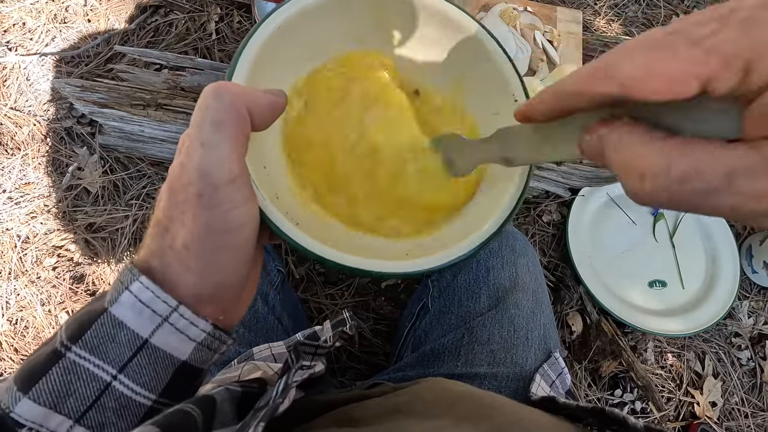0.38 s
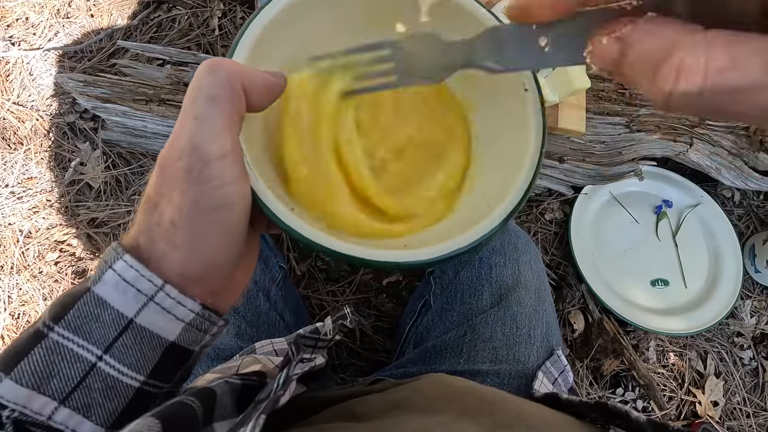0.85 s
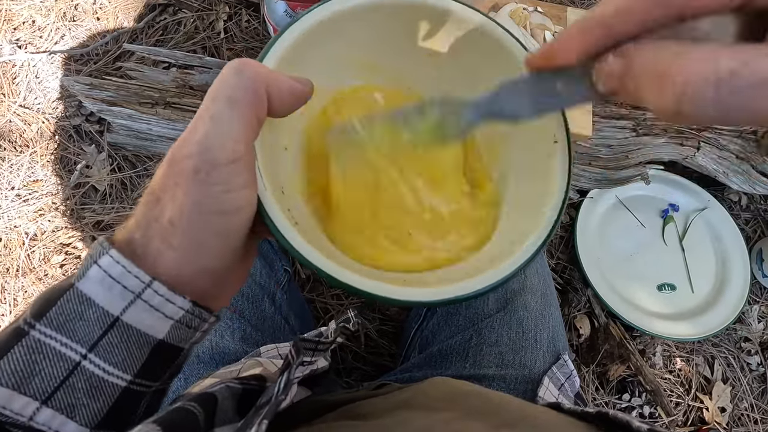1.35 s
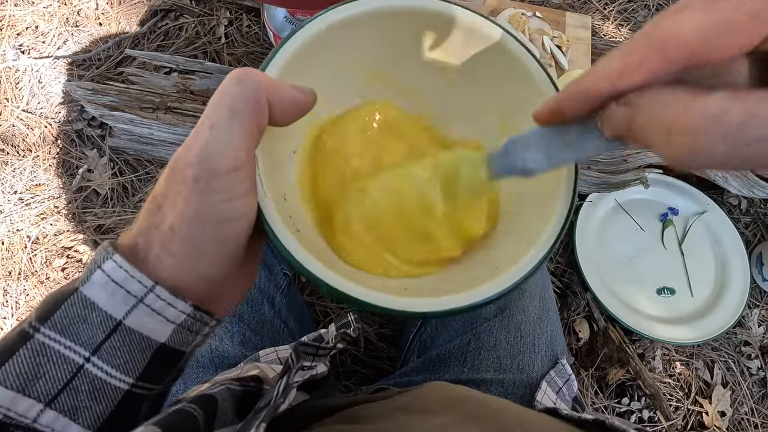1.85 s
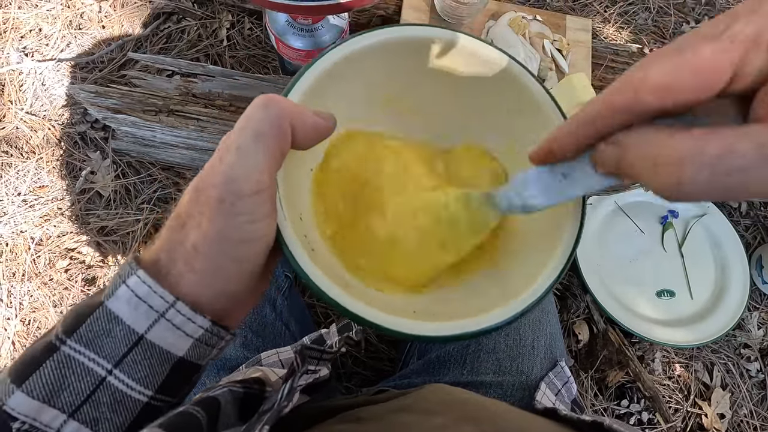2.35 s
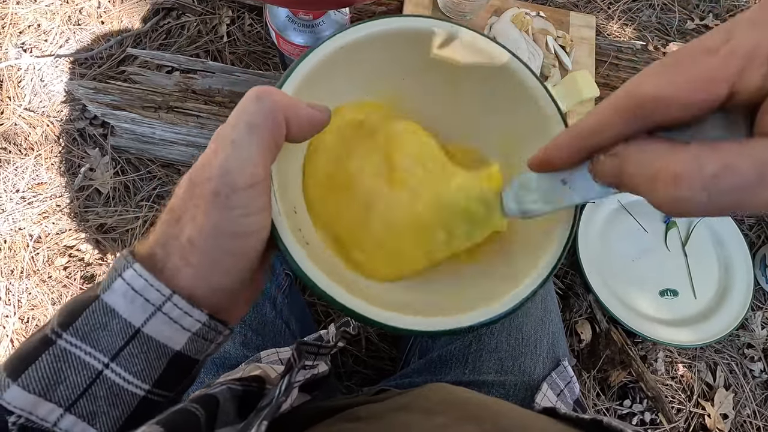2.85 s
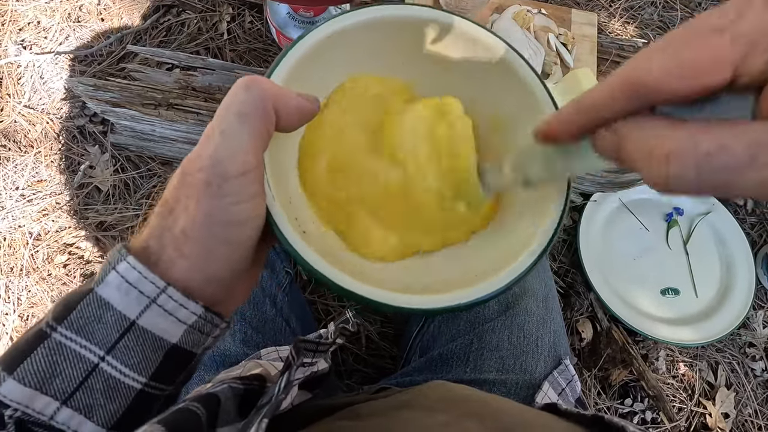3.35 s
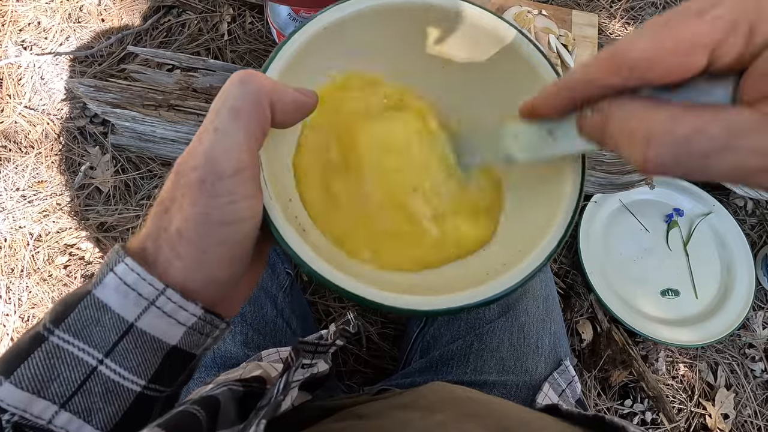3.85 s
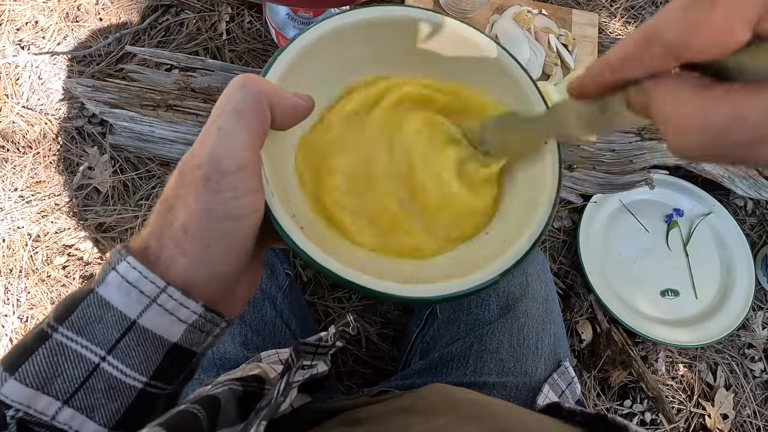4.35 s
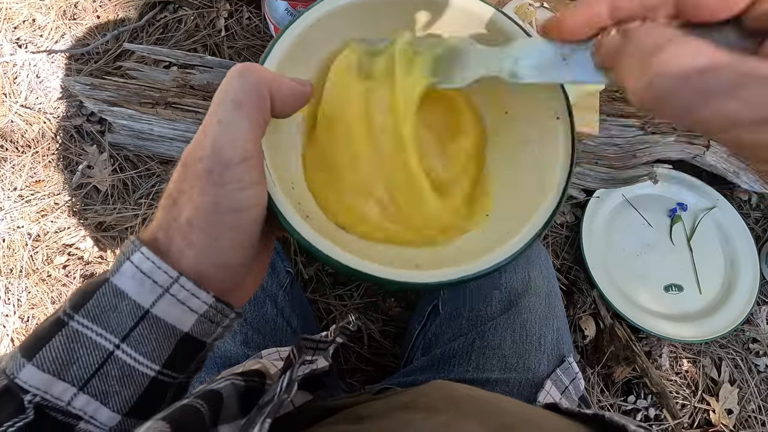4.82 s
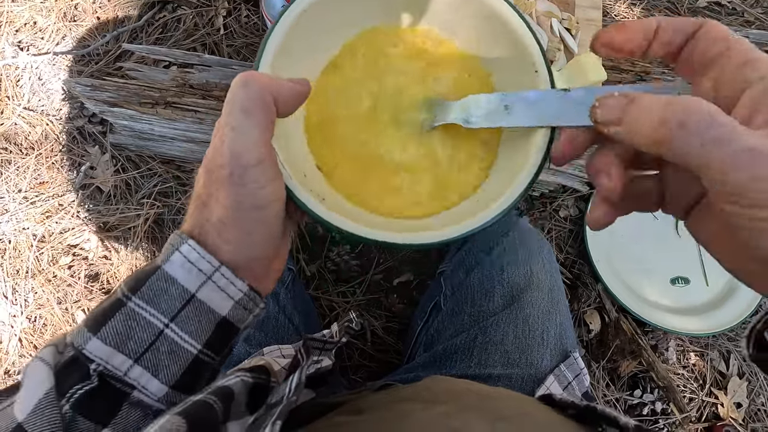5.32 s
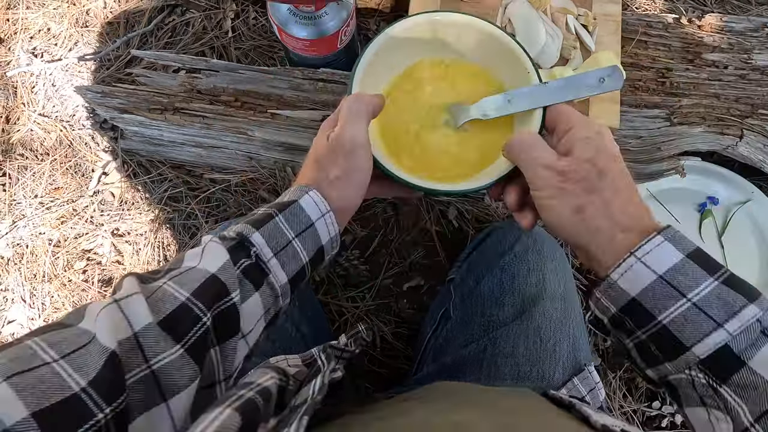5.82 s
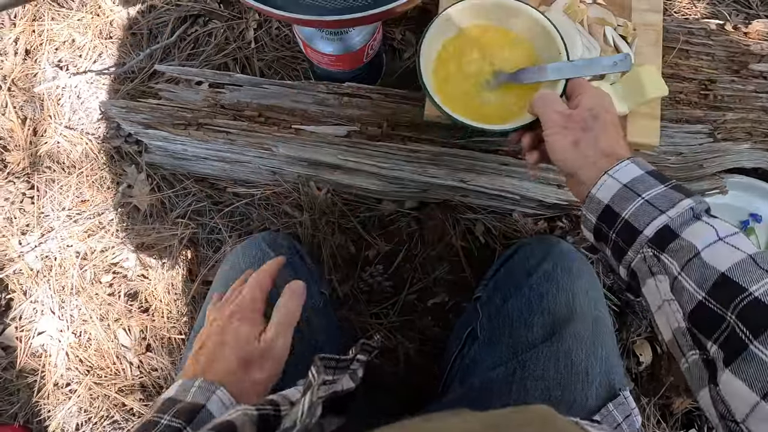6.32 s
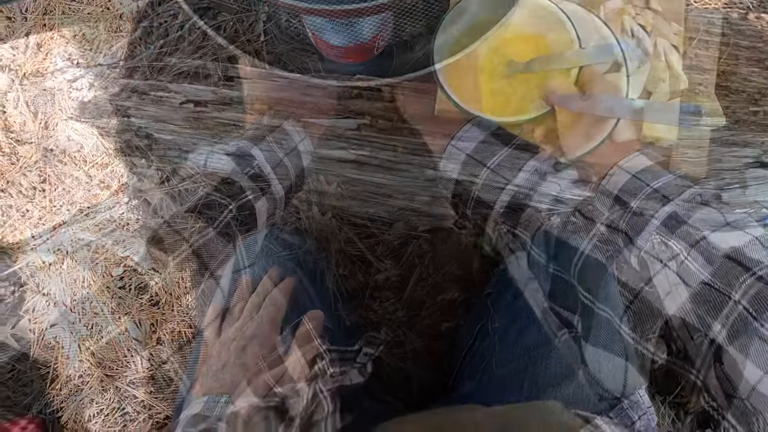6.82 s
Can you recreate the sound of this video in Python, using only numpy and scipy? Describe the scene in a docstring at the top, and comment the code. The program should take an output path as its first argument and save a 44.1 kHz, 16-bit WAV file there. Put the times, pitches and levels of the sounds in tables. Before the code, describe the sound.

A table knife beats thick egg in a hand-held enamel bowl, quick metallic ticks and wet slaps, then rests and the bowl is set down outdoors.

```python
"""Quick ticks and wet scrapes: a table knife beats eggs in a hand-held enamel bowl, six strokes a second.
Ticks ring the metal, the dragging blade sticks and slips, and air pockets in the egg gulp and pop as sines.
Then the knife is laid down, slides and settles on the rim, and the bowl is set on a board with a knock and a crunch.
Outdoors behind it, shaped noise makes wind in far trees and a low rumble; a faint sine is a bird's peep.
"""
import sys
import numpy as np
from scipy import signal
from scipy.fft import rfft, irfft, next_fast_len
from scipy.io import wavfile

SR = 44100
rng = np.random.default_rng(int(sys.argv[2]) if len(sys.argv) > 2 else 0)


def invert_db(x):
    """Field ratio 10**(x/20) for x, a level in decibels (scalar or array-like)."""
    u = np.asarray(x, float) / 20
    return 10 ** u


def generate_wav(signal):
    """Clip the signal to [-1, 1] and save it as 16-bit WAV at the path in sys.argv[1]."""
    frames = np.transpose(np.atleast_2d(signal))
    scaled = np.clip(frames, -1, 1) * 32767
    pcm = np.round(scaled).astype(np.int16)
    wavfile.write(sys.argv[1], SR, pcm)


N = 317079   # length of the scene in samples


def rms_one(x):
    """Scale to unit rms (average strength)."""
    return x / np.sqrt(np.mean(x ** 2) + 1e-20)


def curve_db(rows):
    """Turn rows of (time [s], level [dB]) into a gain per sample, silent outside them."""
    s, db = np.transpose(rows)
    return invert_db(np.interp(np.arange(N) / SR, s, db, left=-200, right=-200))


def ring(clicks, hz, t60):
    """Each unit click starts a sine near height 1 that falls by 60 dB in t60 seconds."""
    r = invert_db(-60 / (t60 * SR))
    w = 2 * np.pi * hz / SR
    return signal.lfilter([0, np.sin(w)], [1, -2 * r * np.cos(w), r * r], clicks + 1e-18)


def dying_clicks(clicks, t60):
    """Each click becomes a sudden start that falls by 60 dB in t60 seconds."""
    return signal.lfilter([1], [1, -invert_db(-60 / (t60 * SR))], clicks)


def colour(x, spectrum):
    """Shape noise to rows of (frequency [Hz], level [dB per Hz]), then scale to unit rms."""
    size = next_fast_len(N)
    hz, db = np.transpose(spectrum)
    axis = np.log(np.fft.rfftfreq(size, 1 / SR) + 1)
    gain = invert_db(np.interp(axis, np.log(hz), db))
    return rms_one(irfft(rfft(x, size) * gain, size)[:N])


def grains(per_s, spread_db):
    """Random clicks of uneven size and sign."""
    sizes = invert_db(spread_db * np.minimum(rng.exponential(1, N), 5)) * rng.choice([-1, 1], N)
    return sizes * (rng.random(N) < per_s / SR)


def passed(x, hz, kind, order=2):
    """Butterworth filter: keep only low, high or middle frequencies."""
    return signal.sosfilt(signal.butter(order, hz, kind, fs=SR, output="sos"), x)


# blade touching the bowl; the faintest rows are small pops in the egg:
# (time [s], level [dB], treble [dB])
TICKS = [(0.0027, -17, -9), (0.1455, -28, 0), (0.1572, -15, -1.5), (0.3501, -15, 2), (0.548, -10, -3),
         (0.7134, -29.5, -21), (0.7501, -22.5, -7), (0.7562, -5, -3), (0.9322, -19, -3.5),
         (0.941, -11.5, -0.5), (0.9498, -18, -4.5), (0.9631, -15, -11), (1.1192, -13.5, -3.5),
         (1.24, -34, -11), (1.2876, -9, -2.5), (1.2967, -6.5, -23), (1.411, -25, -35), (1.4511, -8, -4),
         (1.4664, -30.5, -7), (1.5568, -32.5, -12), (1.6295, -12, -4.5), (1.6389, -18, -11),
         (1.7918, -27, -16.5), (1.8003, -25.5, -8), (1.809, -11, -2.5), (1.9267, -32, -4),
         (1.9827, -9.5, -6), (2.1346, -22.5, -14.5), (2.1525, -11.5, -11), (2.2649, -30.5, -11),
         (2.305, -20, 4.5), (2.3282, -8, -6.5), (2.4053, -18.5, -5), (2.446, -30, -17),
         (2.5078, -12.5, -5.5), (2.5488, -21, 2), (2.6755, -11, -12.5), (2.8472, -11.5, -2),
         (2.9766, -32, -11), (3.0166, -15.5, -17), (3.024, -10.5, -5), (3.1951, -10.5, -5),
         (3.3533, -23, -38.5), (3.3705, -10.5, -5), (3.4555, -25, -30), (3.5305, -11, -8),
         (3.5372, -13, -6.5), (3.5482, -12, -5), (3.5661, -15.5, -9), (3.655, -25, -18.5),
         (3.7164, -10, -17), (3.7267, -14.5, -5), (3.877, -30, -28.5), (3.8846, -17.5, -12),
         (3.8927, -9, -7), (3.909, -26.5, -8.5), (4.0617, -13, -3.5), (4.0732, -24, -26.5),
         (4.1407, -33.5, -5), (4.1703, -30, -32), (4.213, -28, -27), (4.2237, -14, -5.5),
         (4.3955, -13.5, -1.5), (4.534, -25, -36), (4.564, -12, -23), (4.5717, -14.5, -0.5),
         (4.6282, -15, -5), (4.7276, -8.5, -11.5), (4.7418, -11.5, -2.5), (4.7813, -15, -32.5),
         (4.876, -26.5, -19.5), (4.893, -11, -11.5), (4.8985, -7.5, -20.5), (4.9657, -33.5, -25.5),
         (5.106, -12, -7.5), (5.1137, -12.5, -8)]
# ringing modes of the bowl and blade, damped by egg: (frequency [Hz], level [dB], ring time t60 [s])
BOWL = [(244, -24, 0.031), (846, -12, 0.02524), (1100, -1.5, 0.025), (1500, -4, 0.012), (1899, -7, .04),
        (2189, -6, 0.026), (2710, -5, 0.022), (3053, -6, 0.021), (3514, -8, 0.036), (3988, -7, 0.019),
        (4634, -12, 0.024), (5050, -27, 0.13), (5564, -14, 0.025), (6536, -12.5, 0.019), (7246, -16, .02),
        (8090, -28.5, .02), (11280, -10, 0.0055)]
SKID_MS, SKID_DB = 3.0, -4.0   # time range and relative level of a second, weaker click after each tick
SNAP_DB = 3.0   # bare click, before filtering


def ticks():
    """Blade touches, and faint egg pops made alike: each rings every mode with its own luck, a snap and a crack."""
    s, peak_db, treble_db = np.transpose(TICKS)
    at = np.round(s * SR).astype(int)
    luck = rng.normal(0, 1, (len(s), len(BOWL)))
    skid = at + 8 + (SKID_MS / 1000 * SR * rng.random(len(s))).astype(int)   # a touching blade skids
    ringing = np.zeros(N)
    for k, (hz, level_db, t60) in enumerate(BOWL):
        clicks = np.zeros(N)
        firm_db = 12.0 * t60 * (peak_db + 9)      # firm blows favour the long-ringing modes
        blow_db = peak_db + level_db - 7.0 + firm_db + (treble_db + 9.0) * (hz > 5300)
        clicks[at] = invert_db(blow_db + 5.56 * luck[:, k]) * (-1) ** k
        # another mode's luck makes the second click differ from the first
        clicks[skid] += invert_db(blow_db + SKID_DB + 6.4 * luck[:, k - 5]) * (-1) ** (k // 2)
        ringing += ring(clicks, hz, t60)
    knocks = np.zeros(N)
    knocks[at] = invert_db(peak_db + .5 * treble_db)
    crack = passed(dying_clicks(knocks, 0.015) * rng.standard_normal(N), [900, 9000], "band")
    snap = passed(passed(knocks, 2500, "high"), 7500, "low")
    return ringing + invert_db(SNAP_DB) * snap + invert_db(1.35) * crack


# strokes across the bowl:
# (start [s], firmest moment [s], level at that moment [dB], lift-off [s], lower furrow resonance [Hz])
STROKES = [(0.0, 0.025, -23.5, 0.049, 1010), (0.149, 0.196, -43, 0.26, 1310),
           (0.345, 0.4, -31.5, 0.431, 1200), (0.546, 0.601, -24, 0.6316, 1200),
           (0.747, 0.794, -33, 0.838, 1280), (0.93, 0.998, -25, 1.0115, 740),
           (1.115, 1.165, -21.5, 1.1835, 1590), (1.284, 1.325, -26, 1.362, 1160),
           (1.45, 1.5, -22.5, 1.525, 1390), (1.625, 1.663, -20, 1.685, 1040),
           (1.799, 1.85, -19.5, 1.864, 1260), (1.98, 2.02, -25, 2.053, 910),
           (2.137, 2.188, -22, 2.218, 1100), (2.306, 2.366, -21.5, 2.39, 1730),
           (2.499, 2.552, -25, 2.58, 1020), (2.671, 2.726, -27, 2.752, 1060),
           (2.842, 2.891, -23.5, 2.929, 1155), (3.014, 3.069, -24, 3.095, 810),
           (3.191, 3.228, -20.5, 3.27, 1060), (3.361, 3.427, -25.5, 3.449, 920),
           (3.528, 3.589, -25, 3.618, 1060), (3.713, 3.765, -19, 3.797, 1460),
           (3.889, 3.931, -24.5, 3.963, 1510), (4.056, 4.104, -19.5, 4.125, 1500),
           (4.22, 4.25, -23, 4.31, 940), (4.391, 4.484, -26.5, 4.498, 710),
           (4.559, 4.632, -25, 4.659, 1740), (4.723, 4.782, -20.5, 4.801, 1040),
           (4.887, 4.929, -29.5, 4.96, 1270), (5.103, 5.138, -31, 5.161, 755)]
USUAL_FIRM_DB = -24   # firmest pressure of a usual stroke
DRAG_DB, DRAG_FOLLOWS = -33, 0.59   # usual pressure before bearing down; share of a stroke's extra force
EASE_DB_PER_S, EASE_START_DB = 150.5, -5.5   # pressure falls after the firmest moment
LAND_S, BEAR_S, LEAVE_S = .006, .016, .025   # landing, bearing down, leaving the egg


def pressure():
    """Blade pressure: lands, eases, bears down mid-bowl, lifts off."""
    rows = []
    for start, firm, firm_db, lift, hz in STROKES:
        drag_db = DRAG_DB + DRAG_FOLLOWS * (firm_db - USUAL_FIRM_DB)
        last_db = firm_db + EASE_START_DB - EASE_DB_PER_S * (lift - firm)
        rows += [(start - LAND_S, -85), (start + .002, drag_db + 4.5)]
        rows += [(firm - BEAR_S, drag_db), (firm, firm_db)]
        rows += [(max(lift - .012, firm + .002), last_db)]
        rows += [(lift + 0.0073, last_db - 16), (lift + LEAVE_S, -85)]
    return curve_db(sorted(rows))


def stick_slip(press, slide):
    """A rubbing blade sticks and slips in many tiny jerks, which ring the bowl's modes."""
    slips = rms_one(grains(3000, spread_db=4.0)) * (invert_db(-5.5) * press + invert_db(9.5) * slide)
    rubbed = np.zeros(N)
    for hz, level_db, t60 in BOWL:
        rubbed += invert_db(level_db) * ring(slips, hz, t60) * np.sqrt(1 / t60 / SR)
    return rubbed


# colour of the drag: (frequency [Hz], level [dB per Hz])
DRAG = [(300, -36), (900, -11), (2400, -8), (4000, -14.5), (7200, -22), (11500, -35.5), (16000, -69)]


def drag_hiss(press, slide):
    """Grainy noise of scraping; it grows slower than the pressure."""
    hiss = press ** 0.55 * colour(grains(4000, spread_db=4.0), DRAG)
    rim_grit = rms_one(passed(grains(1500, spread_db=5.0), [1200, 6500], "band"))
    return hiss + invert_db(14.5) * slide * rim_grit


def splats(press):
    """Wet crackle under the blade: tiny pockets of every size burst and ring a few dozen cycles."""
    bursts = grains(1000, spread_db=5.0)
    dealt = rng.integers(0, 28, N)   # deals each burst to one of 28 pitches
    out = np.zeros(N)
    drag_hz, drag_db = np.transpose(DRAG)
    for k, hz in enumerate(np.geomspace(600, 8200, 28)):
        level_db = np.interp(np.log(hz), np.log(drag_hz), drag_db) + 20 * np.log10(hz / 1000)
        out += invert_db(level_db) * ring(bursts * (dealt == k), hz, 40.0 / hz)
    return press ** 0.71 * rms_one(out)


FURROW_TOP_HZ, FURROW_SCATTER = 2429, .09   # upper resonance and its relative change between strokes


def furrow(press):
    """Egg sloshes in the furrow behind the blade: lumpy noise in two resonances that differ with each stroke."""
    out = np.zeros(N)
    lumps = press * rms_one(grains(3000, spread_db=4.5))
    for (start, firm, firm_db, lift, low_hz), luck in zip(STROKES, rng.normal(0, 1, len(STROKES))):
        high_hz = FURROW_TOP_HZ * (1 + FURROW_SCATTER * luck)
        span = slice(max(round(start * SR), 0), round((lift + .03) * SR))
        for hz, level_db, t60 in ((low_hz, -4.0, .018), (high_hz, -1.5, .011)):
            even = np.sqrt(6 * np.log(10) / t60 / SR)   # evens out long and short ringing
            out[span] += invert_db(level_db) * even * ring(lumps[span], hz, t60)
    return out


# loud air pockets closing in the egg; the last two rows are the knife ringing as it is laid down:
# (time of peak [s], level [dB], frequency [Hz], ring time t60 [ms])
GULPS = [(0.02, -8.5, 973, 25), (0.021, -17, 2294, 38), (0.158, -13, 1355, 14), (0.554, -18.5, 3170, 49),
         (0.599, -13, 2393, 15), (0.754, -18, 2150, 8), (0.946, -13.5, 598, 37), (0.963, -12, 2860, 25),
         (0.964, -15.5, 1590, 15), (1.12, -9, 912, 21), (1.159, -18, 2300, 47), (1.241, -21, 1250, 12),
         (1.289, -12.5, 1280, 29), (1.33, -9.5, 1120, 17), (1.49, -16, 1180, 18), (1.501, -17.5, 2630, 64),
         (1.662, -17.5, 2303, 80), (1.665, -7.5, 1160, 15), (1.836, -13, 1700, 47), (1.843, -8, 1205, 39),
         (1.846, -15.5, 2334, 20), (1.9, -28.5, 412, 45), (1.983, -11, 1330, 8.2), (2.022, -17, 2293, 28),
         (2.185, -19, 2020, 20), (2.196, -7.5, 1134, 32), (2.33, -12.5, 2540, 25), (2.331, -13.5, 1080, 24),
         (2.357, -13.5, 1622, 84), (2.367, -10.5, 2286, 22), (2.371, -7.5, 1377, 27),
         (2.485, -22.5, 478, 37), (2.551, -10.5, 1166, 22), (2.676, -8.5, 2800, 15),
         (2.848, -5.5, 2197, 19), (2.854, -19.5, 440, 38), (2.979, -21, 804, 13), (3.067, -17, 2680, 15),
         (3.072, -17, 862, 37), (3.196, -9.5, 2610, 15), (3.196, -15, 447, 39.3), (3.223, -13, 1720, 23),
         (3.241, -15, 2250, 20), (3.425, -14.5, 562, 15), (3.533, -11.5, 1742, 49), (3.539, -20, 520, 50),
         (3.592, -8.5, 1080, 49), (3.619, -26, 472, 44), (3.728, -18.5, 1126, 80), (3.764, -11, 1465, 20),
         (3.766, -14, 2140, 30), (3.892, -11, 1276, 24), (3.929, -5.5, 1495, 19), (4.063, -12, 2054, 22),
         (4.092, -11.5, 1760, 15), (4.142, -27, 450, 40), (4.225, -12.5, 1236, 46),
         (4.226, -13.5, 2300, 80), (4.237, -14, 2740, 13), (4.245, -5.5, 2180, 23),
         (4.396, -16.5, 1026, 36), (4.573, -10.5, 386, 67), (4.627, -14, 744, 49), (4.743, -11.5, 1370, 20),
         (4.761, -14.5, 1840, 26), (4.781, -13, 1100, 36), (4.782, -7, 2770, 31), (4.931, -16, 1366, 67),
         (5.108, -20, 686, 63), (5.108, -19, 394, 37)]
# time to swell by 12 dB for rows close to a tick, or for the others; how near a tick must be
SLAPPED_MS, FOLDED_MS, SLAP_REACH_S = 1.0, 3.5, .012
SMALL_GULP_DB, SMALL_GULP_SPREAD_DB = 3, 2.5   # loudest, over the stroke's level; half the range below it
SMALL_SWELL_MS, SMALL_T60_MS = 10.0, 41.6   # middle swell time; ring time
SMALL_LOW_HZ, SMALL_HIGH_HZ = 700.4, 2800


def gulps_and_knife_rings():
    """List the loud pockets, the knife's two rings, and two small pockets at random in every stroke."""
    tick_s = np.array(TICKS)[:, 0]
    rows = []   # (time [s], level [dB], frequency [Hz], swell time [ms], ring time t60 [ms])
    for s, db, hz, t60_ms in GULPS:
        slapped = np.any(abs(s - tick_s) < SLAP_REACH_S)
        rows.append((s, db, hz, SLAPPED_MS if slapped else FOLDED_MS, t60_ms))
    for (start, firm, firm_db, lift, hz), luck in zip(STROKES, rng.random((len(STROKES), 2, 4))):
        for when, size, loud, slow in luck:
            s = start + .025 + (lift - start - .025) * when
            db = firm_db + SMALL_GULP_DB - 2 * SMALL_GULP_SPREAD_DB * loud
            small_hz = SMALL_LOW_HZ * (SMALL_HIGH_HZ / SMALL_LOW_HZ) ** size
            rows.append((s, db, small_hz, SMALL_SWELL_MS * (.5 + slow), SMALL_T60_MS))
    return rows


GULP_WAVER, GULP_FLUTTER_DB = .05, 3.5   # base depth of the relative pitch wobble; level flutter


def swell_and_ring():
    """A pocket swells, rings down, rises in pitch as it shrinks and wavers; the knife's two rings are made alike."""
    rows = gulps_and_knife_rings()
    out = np.zeros(N + SR)
    luck = rng.random((len(rows), 2))
    waver = rms_one(passed(rng.standard_normal(N + SR), 180, "low"))   # the moving egg
    for (s, peak_db, hz, swell_ms, t60_ms), (turn, lean) in zip(rows, luck):
        lead = int(swell_ms * SR / 400)
        tail = int(t60_ms * SR / 1000)
        i = max(round(s * SR) - lead, 0)
        t = (np.arange(i, i + lead + tail) - round(s * SR)) / SR   # zero at the peak
        span = slice(i, i + len(t))
        shape = invert_db(np.where(t < 0, 12 * t / (swell_ms / 1000), -60 * t / (t60_ms / 1000)))
        wobble = GULP_WAVER * np.clip(swell_ms / 6, .3, 2) * waver[span]
        pitch = hz * (1 + 2.0 * lean * np.maximum(t, 0) + wobble)
        level = invert_db(peak_db + GULP_FLUTTER_DB * waver[i + 900:i + 900 + len(t)])
        out[span] += level * shape * np.sin(2 * np.pi * (turn + np.cumsum(pitch) / SR))
    return out[:N]


# bubbles popping between strokes: (time [s], level [dB], frequency [Hz])
POPS = [(.129, -30.5, 1380), (.51, -38, 2840), (.69, -43, 1170), (0.854, -36, 2350), (.877, -32, 2200),
        (1.07, -40, 4500), (1.087, -38, 2520), (1.384, -29, 1460), (1.896, -32, 816), (2.096, -35.5, 880),
        (2.243, -31.5, 1330), (2.284, -32, 1310), (2.792, -31.5, 875), (2.822, -32, 2180),
        (2.952, -30.5, 816), (2.991, -31.5, 1850), (3.126, -36, 1143), (3.316, -25, 740),
        (3.336, -36, 2830), (3.511, -26.5, 1500), (3.656, -28.5, 1140), (3.672, -29, 748),
        (4.017, -26.5, 1100), (4.699, -23.5, 953), (5.005, -39, 897), (5.079, -33, 1450)]


def froth():
    """Bubbles pop with a snap of noise and a short rising ring; fainter ones ring at random times."""
    faint = grains(160, spread_db=4.0) * (np.arange(N) < 5.15 * SR)
    dealt = rng.integers(0, 12, N)   # deals each faint bubble to one of 12 pitches
    pitches = np.geomspace(450, 4500, 12)
    out = invert_db(-48) * sum(ring(faint * (dealt == k), hz, 21.0 / hz) for k, hz in enumerate(pitches))
    snaps = np.zeros(N)
    t = np.arange(SR // 20) / SR
    for s, peak_db, hz in POPS:
        i = round(s * SR)
        level = invert_db(peak_db + 0.5 - 60 * t * hz / 23.0)
        out[i:i + len(t)] += level * np.sin(2 * np.pi * hz * t * (1 + 3.0 * t))
        snaps[i] = invert_db(peak_db - 6.0)
    return out + passed(dying_clicks(snaps, .012) * rng.standard_normal(N), [1000, 6500], "band")


# blade sliding along the rim as the hand lets go: (time [s], level [dB])
SLIDES = [(5.175, -50), (5.225, -57), (5.26, -57), (5.379, -54), (5.445, -49.5), (5.49, -63), (5.63, -54),
          (5.68, -55.5)]
SLIDE_RISE_DB_PER_S, SLIDE_FALL_DB_PER_S = 700, 280


def sliding():
    """Strength of the slides: each starts quickly and fades more slowly."""
    t = np.arange(N) / SR
    out = np.zeros(N)
    for s, db in SLIDES:
        out += invert_db(db - np.maximum(SLIDE_RISE_DB_PER_S * (s - t), SLIDE_FALL_DB_PER_S * (t - s)))
    return out


# knife shifting on the rim: (time [s], level [dB], looseness [dB]: how far other modes join the main one)
SETTLING = [(5.295, -46, -15), (5.315, -39.5, -15), (5.339, -41, -15), (5.376, -42.5, -6),
            (5.397, -39.5, -12), (5.441, -40.5, 5.5), (5.625, -51.5, 5)]
# ringing modes of the knife, main one first: (frequency [Hz], level [dB], ring time t60 [s])
KNIFE = [(1940, -0.5, 0.04), (1510, 1, 0.022), (2670, -0.5, .025), (3445, -5.5, 0.02)]
CHINK_T60_S = 0.044   # length of the grating contact


def knife_on_rim():
    """The knife chinks on the rim: a short grating contact rings its modes."""
    out = np.zeros(N)
    s, peak_db, loose_db = np.transpose(SETTLING)
    grit = rng.standard_normal(N)
    for k, (hz, level_db, t60) in enumerate(KNIFE):
        chinks = np.zeros(N)
        chinks[np.round(s * SR).astype(int)] = invert_db(peak_db + level_db + loose_db * (k > 0))
        grating = dying_clicks(chinks + 1e-18, CHINK_T60_S) * grit
        out += invert_db(-19.0) * ring(grating, hz, t60)
    return out


# bowl touching the board and rocking: (time [s], level [dB])
SET_DOWN = [(6.49, -37), (6.5006, -13), (6.5024, -9), (6.509, -18), (6.524, -27.5)]
# ringing modes of the knock: (frequency [Hz], level [dB], ring time t60 [s])
BOARD = [(479.6, -13, 0.047), (659.6, -15, 0.032), (880, -6.5, 0.029), (1044, -3, 0.033), (1160, -4, 0.031),
         (1426, -16.5, 0.042), (1629, -29, 0.04), (2100, -37, 0.033), (2500, -31, 0.03), (2960, -34, 0.025),
         (3730, -27, 0.0244)]


def bowl_on_board():
    """The bowl knocks softly on the board, ringing its modes, and crunches as it rocks."""
    s, peak_db = np.transpose(SET_DOWN)
    at = [round(moment * SR) for moment in s]
    luck = rng.normal(0, 1, (len(s), len(BOARD)))
    knock, blows = np.zeros(N), np.zeros(N)
    for k, (hz, level_db, t60) in enumerate(BOARD):
        clicks = np.zeros(N)
        clicks[at] = invert_db(peak_db + level_db + 1.7 * luck[:, k])
        knock += ring(clicks, hz, t60)
    blows[at] = invert_db(peak_db)
    grit = dying_clicks(blows, .07) * rng.standard_normal(N)
    crunch = passed(passed(grit, [300, 1500], "band", order=1), 3510, "low")
    return passed(knock, 2500, "low") + invert_db(-11.0) * crunch


# strength of the wind: (time [s], level [dB])
WIND = [(0, -51), (5.2, -51), (5.6, -50.5), (6.08, -49.5), (6.4, -50), (6.8, -53.5), (7.19, -50.5)]
# colour of the wind in the trees: (frequency [Hz], level [dB per Hz])
TREES = [(15, -60), (25, -34), (74, -14), (219, -8.5), (301, -9.5), (584, -8.5), (940, -15), (1190, -16.5),
         (2140, -24), (5690, -38), (14000, -69.5)]


def wind():
    """Wind in the trees: coloured noise with a slow flutter."""
    flutter = invert_db(1.2 * rms_one(passed(rng.standard_normal(N), 9, "low", order=1)))
    return invert_db(0.5) * curve_db(WIND) * flutter * colour(rng.standard_normal(N), TREES)


# a low rumble swells and fades: (time [s], level [dB])
RUMBLE = [(5.6, -68), (5.9, -49), (6.2, -49), (6.6, -64.5)]


def rumble():
    """Low rumble: a narrow band of noise."""
    return curve_db(RUMBLE) * rms_one(passed(rng.standard_normal(N), [130, 280], "band"))


# the bird's peep swells and fades: (time [s], level [dB])
PEEP = [(7.02, -79), (7.07, -54.5), (7.13, -80)]


def peep():
    """One thin peep: a plain sine at 2610 Hz."""
    return curve_db(PEEP) * np.sin(2 * np.pi * 2610 * np.arange(N) / SR)


def housing(near):
    """The microphone housing cancels a band near 9 kHz, then the treble is rounded off."""
    r = np.exp(-np.pi * 2500 / SR)
    w = 2 * np.pi * 9100 / SR
    dip = [1, -2 * 1.012 * np.cos(w), 1.021 ** 2]
    near = signal.lfilter(dip, [1, -2 * r * np.cos(w), r * r], near)
    return passed(near, 7430, "low")


def two_ports(mid):
    """Two microphone ports hear alike except in the treble, which flickers, and their own hiss and stirring air."""
    scatter = rms_one(passed(rng.standard_normal(N), 250, "low"))
    high = passed(mid, 12000, "high", order=4)
    side = invert_db(0.5) * high * scatter - invert_db(-17) * passed(mid, 9500, "high")
    hiss = invert_db(-100) * passed(rng.standard_normal((2, N)), [9000, 14000], "band")
    buffet = invert_db(-88.0) * rms_one(passed(rng.standard_normal((2, N)), 70, "low"))
    return mid + side * [[1], [-1]] + hiss + buffet


def scene():
    """Add the near sources and the background, heard through two ports."""
    press = pressure()
    slide = sliding()
    near = ticks() + stick_slip(press, slide) + invert_db(-22.0) * drag_hiss(press, slide)
    near += invert_db(-12.0) * splats(press) + furrow(press)
    near += swell_and_ring() + froth() + knife_on_rim() + bowl_on_board()
    mid = housing(passed(near, 150, "high")) + wind() + rumble() + peep()
    return two_ports(mid)


def top_cut(x):
    """Nothing passes above the cut-off."""
    return signal.sosfilt(signal.butter(12, 16510, fs=SR, output="sos"), x)


def record(dry):
    """Cut the deepest bass and round off the loudest peaks."""
    x = passed(dry, 32, "high", order=1)
    mix = 1.281 * np.tanh(x / 1.333)
    return top_cut(mix)


dry = scene()
out = record(dry)
generate_wav(out)
```